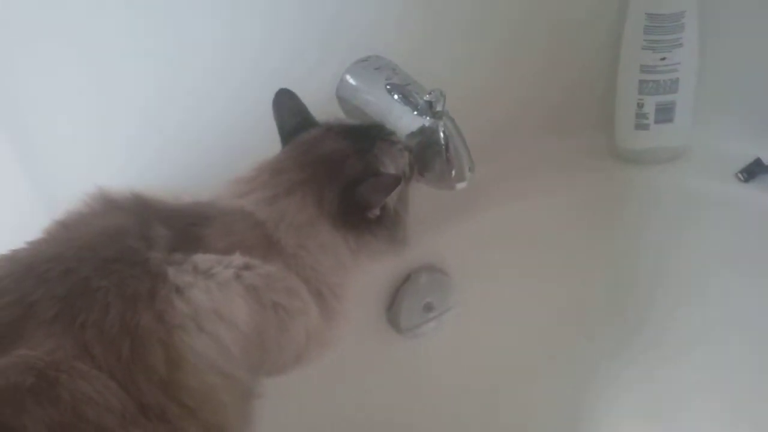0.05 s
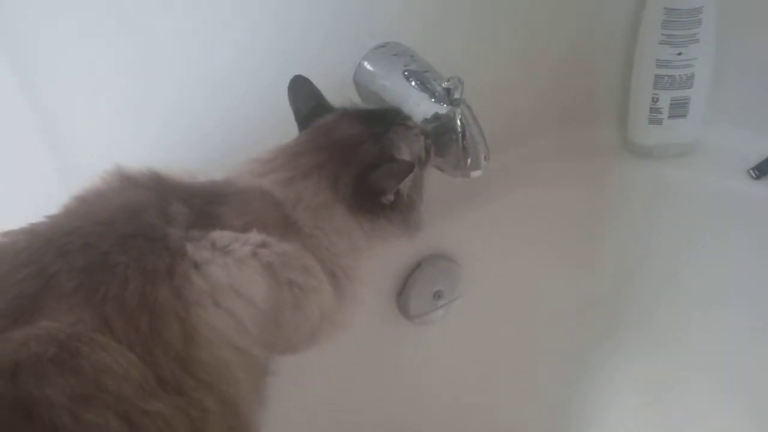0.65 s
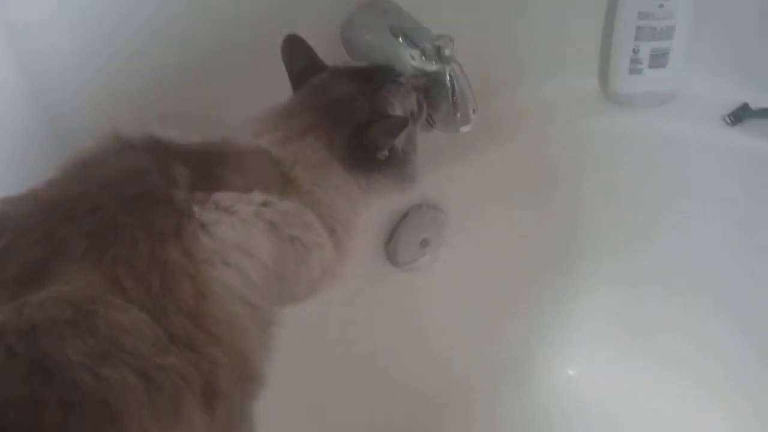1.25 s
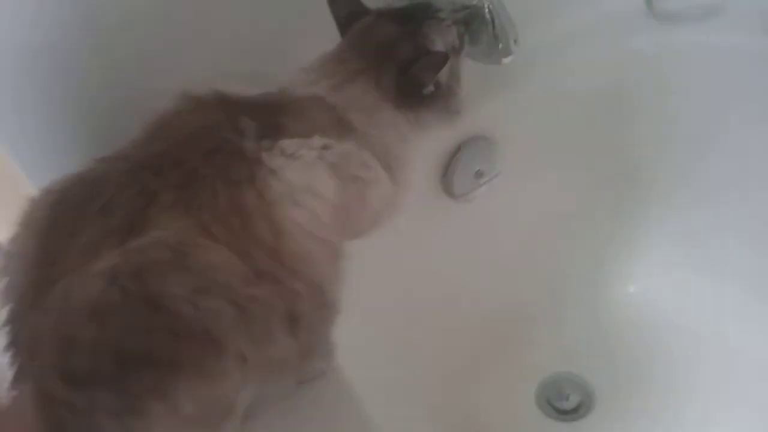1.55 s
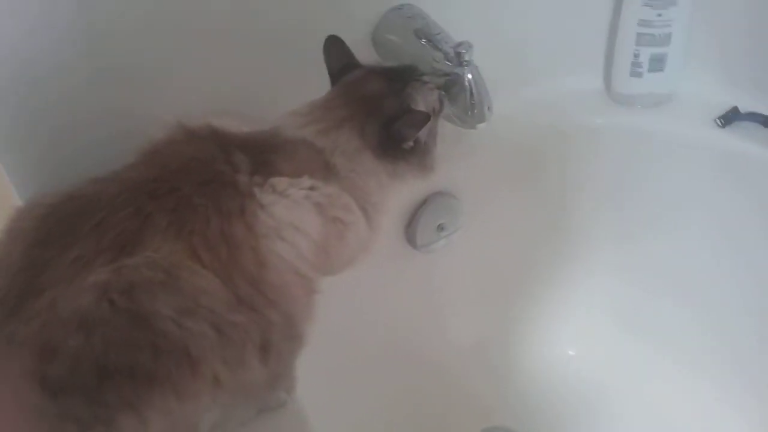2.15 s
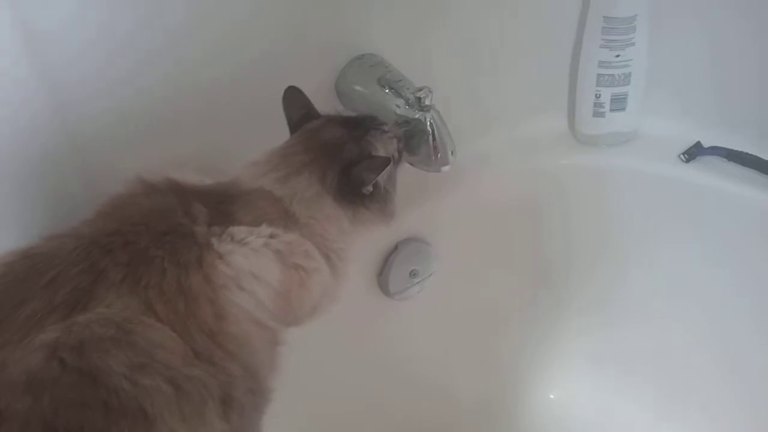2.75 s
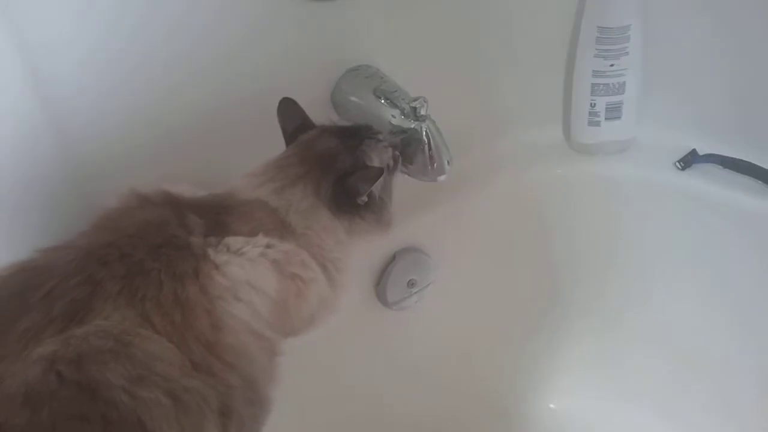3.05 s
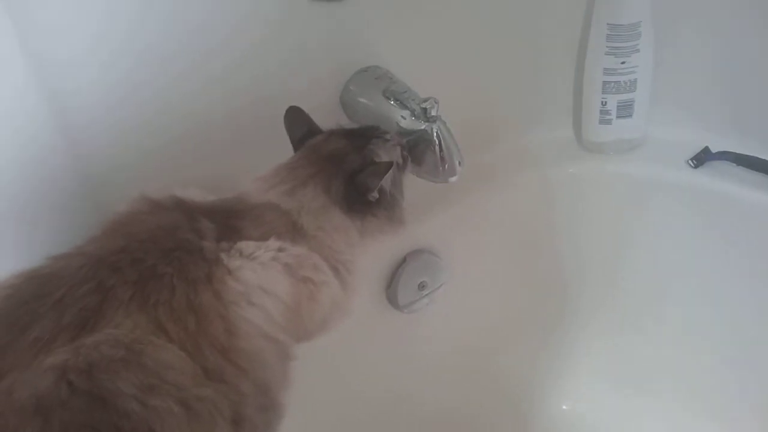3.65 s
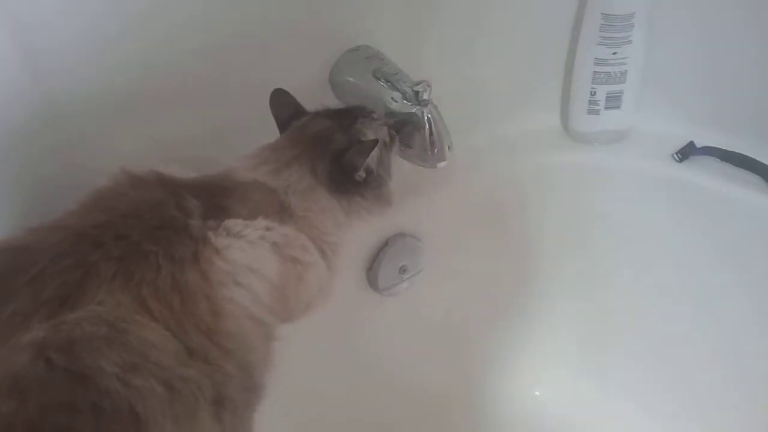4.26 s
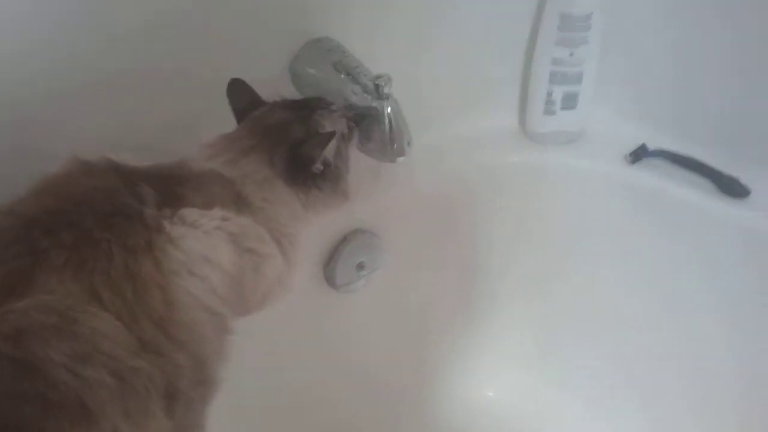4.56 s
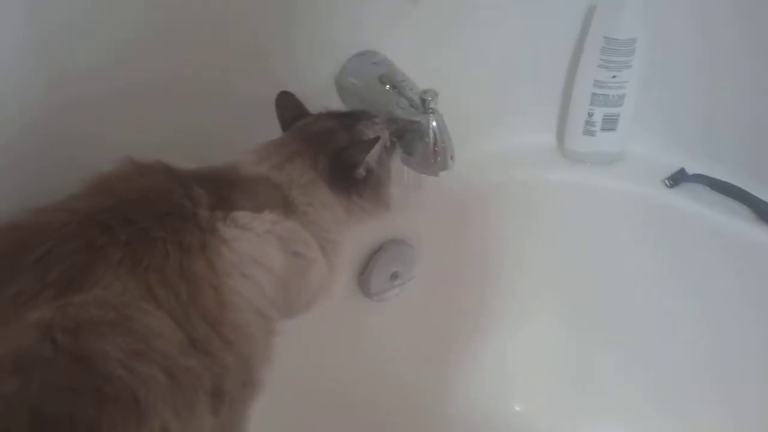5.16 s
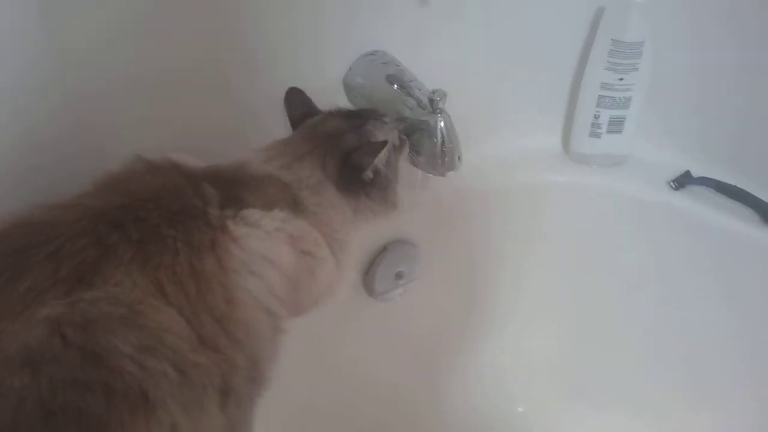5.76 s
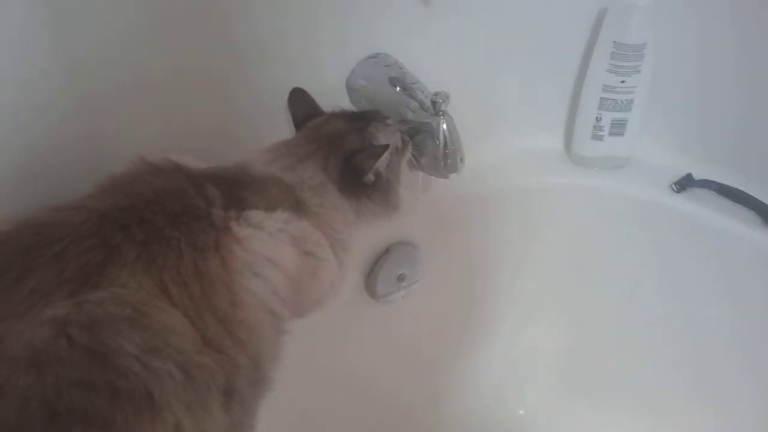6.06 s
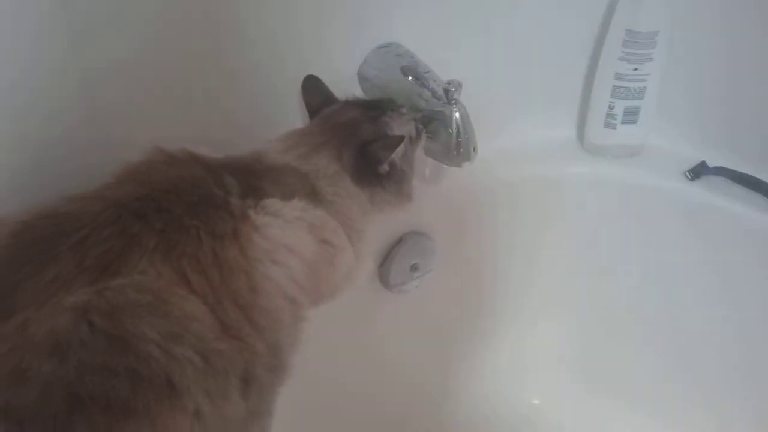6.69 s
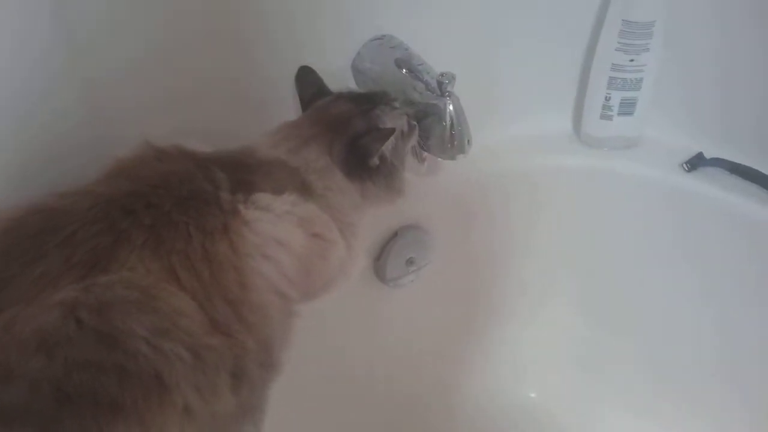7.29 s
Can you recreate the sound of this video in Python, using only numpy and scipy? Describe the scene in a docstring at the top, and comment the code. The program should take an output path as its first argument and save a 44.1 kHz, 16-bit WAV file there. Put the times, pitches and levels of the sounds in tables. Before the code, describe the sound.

A cat laps water from a bathtub tap, with soft wet smacks and irregular sharp, drip-like pops over faint room hiss.

```python
"""A tiled bathroom, heard from a hand-held microphone above the tub: a cat licks water from the spout.
Water films rupture between tongue and metal with a bright snap, and air pockets behind them ring as pops.
The tongue peels off wet surfaces in soft smacks, and tub and tiles reflect each of these sounds.
Behind them lie a few dull bumps, faint room hiss and a low wandering hum."""
import sys
import numpy as np
from scipy import signal
from scipy.fft import rfft, irfft
from scipy.io import wavfile

SR = 44100
rng = np.random.default_rng(int(sys.argv[2]) if len(sys.argv) > 2 else 0)


def persist_wave(psi):
    """Save psi, clipped to +-1, as 16-bit WAV."""
    counts = np.round(np.clip(psi, -1, 1) * 32767).astype(np.int16)
    wavfile.write(sys.argv[1], SR, np.atleast_2d(counts).T)


N = 327663

# spectra of a smack in the mouth, the hollow of the tub and the wet film: f/Hz, relative level/dB
MOUTH_SPECTRUM = [(300, -24), (900, -16), (1500, 4.5), (2100, 5.5), (3000, 2.5), (4200, -5), (6000, -27),
                  (12000, -50)]
TUB_SPECTRUM = [(150, -15), (370, -3.5), (520, -5.5), (650, -2), (730, 6), (830, -3), (1100, -4),
                (1800, -22), (5000, -29.5)]
WET_SPECTRUM = [(2000, -20.5), (4200, -9), (5500, 0), (6300, 3), (7200, -6), (9000, -20.5), (12000, -13),
                (15500, -18)]
FILM_HZ, FILM_SPREAD_HZ = 14700, 640   # the tiniest bubbles in a film ring near the top of hearing


def pops(lowpass_hz=7600, beam_db=2):
    """Bubble resonance: a film breaks with a snap and a knock, and the air pocket behind it rings."""
    # beads of water popping (levels are energies): t/s, ring level/dB, f/Hz, snap level/dB, room gain/dB
    beads = [(0.0647, -2, 6050, -24, 6.5), (0.9847, -4.5, 6000, -15.5, 5.7),
             (1.2644, -21.5, 6630, -27.5, 3.5), (2.6675, -3.5, 5400, -22.5, 5),
             (2.9896, -23.5, 5390, -28, 5), (3.6577, -28.5, 6800, -31, 8), (3.869, -23, 6450, -30.5, 5.5),
             (4.0176, -4.5, 6310, -25.5, 3), (4.8331, -15.5, 6370, -35, 10), (5.1544, -21.5, 6630, -31, 11),
             (6.0023, 4, 5820, -19, 2.5), (6.529, -20.5, 6600, -27, 10.5), (6.6055, -19.5, 5970, -19, 6),
             (6.857, -13, 5700, -39, 5.5)]
    # spectrum of the knock: f/Hz, relative level/dB
    knock_spectrum = [(500, -12), (1300, -5), (2200, 1), (3300, 8.5), (4400, 18.5), (5500, -1), (7500, -30),
                      (12000, -68)]
    out, knock = np.zeros(N), impulse(knock_spectrum)
    t = np.arange(len(knock)) / SR
    lowpass = signal.butter(2, lowpass_hz, fs=SR, output="sos")
    for onset, ring_db, hz, snap_db, room_db in beads:
        swell_cycles = 0.86 - 0.013 * ring_db   # time constant, longer when the film breaks gently
        age = t * hz / swell_cycles
        envelope = age ** 2.22 * np.exp(-age)
        ring = unit(signal.sosfilt(lowpass, envelope * np.sin(2 * np.pi * hz * t)))
        # the knock grows faster than the ring, and by 30 dB for each octave the pop is deeper
        knock_db = -19 + 1.9 * ring_db - 30 * np.log2(hz / 6260)
        resonance_db = 12 + 0.66 * (snap_db - ring_db)   # fades as the ring takes over
        add(out, onset, bathroom(from_db(ring_db) * ring, room_db))
        # the low knock spreads into the room, the high snap travels more directly
        add(out, onset, bathroom(from_db(knock_db) * knock, room_db + beam_db))
        add(out, onset, bathroom(from_db(snap_db) * snap(FILM_HZ, resonance_db), room_db - beam_db))
    return out


def snap(pitch_hz, resonance_db, width_hz=1300):
    """Impulse excitation: a breaking film clicks, with a spectral peak at its tiniest bubble's pitch."""
    # broadband spectrum of the rupture: f/Hz, relative level/dB
    rupture_spectrum = [(500, -40), (2000, -14), (4000, -14), (6200, -3), (8200, -2.5), (10000, -4),
                        (12000, -3.5), (14000, -4), (15500, -5.5), (17000, -26)]
    hz = np.geomspace(500, 20000, 120)
    broadband_db = np.interp(hz, *np.transpose(rupture_spectrum))
    peak_db = resonance_db / (1 + ((hz - pitch_hz) / width_hz) ** 2)
    return impulse(np.column_stack([hz, broadband_db + peak_db]))


def ticks(resonance_db=16, room_db=2.5):
    """Film rupture: small films give only a bright snap and a little wet crackle."""
    # thin films snapping: t/s, snap level/dB, f/Hz, crackle level/dB
    films = [(0.148, -28.5, 14200, -47), (0.187, -35.5, 11000, -43), (0.2286, -36.5, 14000, -49),
             (0.3135, -40, 12900, -36.5), (0.8707, -44, 13900, -44), (1.1297, -33, 12400, -44),
             (1.1426, -27.5, 14800, -46), (1.2234, -47, 12400, -28), (1.3675, -37, 15000, -35),
             (1.7073, -35.5, 15500, -31.5), (2.6985, -23.5, 15000, -45), (2.804, -34.5, 15700, -30.5),
             (3.4227, -39.5, 14500, -57), (4.149, -36, 13060, -42), (4.917, -38, 13800, -38),
             (5.289, -38, 15300, -36), (5.84, -39, 14700, -44.5), (6.078, -25.5, 15200, -39),
             (6.7454, -28, 10000, -28.5)]
    out = np.zeros(N)
    for onset, snap_db, hz, wet_db in films:
        add(out, onset, bathroom(from_db(snap_db) * snap(hz, resonance_db), room_db))
        add(out, onset, bathroom(from_db(wet_db) * peel(WET_SPECTRUM, decay_s=0.00094), room_db))
    return out


def smacks(room_db=6):
    """Source and filter: each smack is coloured by the mouth, the hollow of the tub and the wet film."""
    # smacks of tongue and mouth: t/s, mouth level/dB, tub level/dB
    strokes = [(0.001, -30.5, -28.5), (0.358, -39, -31), (0.866, -27, -32.5), (1.128, -22, -29.5),
               (1.542, -41.5, -39), (1.613, -42.5, -37), (2.029, -27.5, -32.5), (2.31, -37.5, -30),
               (2.985, -40, -32.5), (3.223, -37.5, -38), (3.296, -66, -33), (3.709, -28, -29),
               (3.953, -36.5, -35), (4.118, -28.5, -30), (5.38, -54, -35.5), (5.63, -58, -33.5),
               (5.95, -42, -33), (6.262, -39.5, -40), (7.076, -41, -30.5), (7.162, -40.5, -35)]
    out = np.zeros(N)
    for onset, mouth_db, tub_db in strokes:
        mouth = from_db(mouth_db) * peel(MOUTH_SPECTRUM)
        tub = from_db(tub_db) * peel(TUB_SPECTRUM, decay_s=0.0066)
        wet = from_db(-9 + 0.65 * mouth_db) * peel(WET_SPECTRUM)   # harder smacks are wetter
        add(out, onset, bathroom(mouth + tub + wet, room_db))
    return out


def peel(spectrum, decay_s=0.0044, clicks_per_s=4000):
    """Shot noise: the tongue leaves a wet surface in a run of tiny clicks that swells and dies."""
    t = seconds(.06)
    clicks = rng.standard_normal(len(t)) * (rng.random(len(t)) < clicks_per_s / SR)
    burst = clicks * np.sqrt(t) * np.exp(-t / decay_s)
    return unit(signal.fftconvolve(burst, impulse(spectrum)))


def faint_licks(count=36, spread_db=5.5, resonance_db=14, room_db=5):
    """Peeling and rupture at low level: the tongue keeps working about five times a second."""
    out = np.zeros(N)
    for k in range(count):
        onset = (k + rng.random()) * N / SR / count
        strength = from_db(spread_db * rng.standard_normal())
        mouth = from_db(-48) * peel(MOUTH_SPECTRUM, decay_s=0.0035)
        tub = from_db(-41) * peel(TUB_SPECTRUM, decay_s=0.0092)
        wet = from_db(-48) * peel(WET_SPECTRUM)
        film = from_db(-46) * snap(FILM_HZ + FILM_SPREAD_HZ * rng.standard_normal(), resonance_db)
        add(out, onset, strength * bathroom(mouth + tub + wet, room_db))
        add(out, onset, strength * bathroom(film, room_db))
    return out


def bathroom(sound, room_db, t60_s=0.25, early_db=-4, wall_s=.0098, roughness_db=1.5):
    """Reverberation: reflections lie room_db above the direct sound; the total energy is kept."""
    # first reflections off tub and tiles: delay/ms, level/dB relative to the diffuse tail
    reflections = [(1.1, -31.5), (10.3, -8.5), (12.0, -9.5), (16.4, -12.5), (23.0, -31)]
    t = seconds(.4)
    scatter = rng.standard_normal(len(t)) * from_db(roughness_db * rng.standard_normal(len(t)))
    decay = from_db(-60 * t / t60_s + early_db * (t < wall_s))   # weaker until the walls answer
    response = unit(scatter * decay * (t > .002))
    for delay_ms, db in reflections:
        path_shift = rng.uniform(.97, 1.03)   # head and hand move a little
        response[int(delay_ms * path_shift * SR / 1000)] += from_db(db)
    heard = from_db(room_db) * unit(signal.fftconvolve(sound, response))
    heard[:len(sound)] += unit(sound)   # the room outweighs this path when the cat's head is in the way
    return unit(heard) * np.sqrt(np.sum(sound ** 2))


def bumps(decay_s=0.061):
    """Damped impacts: decaying noise bursts give soft low knocks, as of a shifting paw or hand."""
    # dull bumps: t/s, level/dB
    impacts = [(1.157, -29.5), (4.12, -33), (4.45, -31), (4.822, -29.5), (5.09, -27.5), (5.31, -27.5),
               (5.394, -29), (6.018, -27), (7.079, -29.5)]
    # spectrum of a bump: f/Hz, relative level/dB
    bump_spectrum = [(40, -17.5), (80, -2), (110, 3.5), (170, 0), (240, -14.5), (400, -11.5), (1000, -57),
                     (4000, -63)]
    out, t = np.zeros(N), seconds(0.13)
    body = impulse(bump_spectrum, size=4096)
    for onset, db in impacts:
        push = rng.standard_normal(len(t)) * np.exp(-t / decay_s)
        add(out, onset, from_db(db) * unit(signal.fftconvolve(push, body)))
    return out


def air(hiss_rms_db=-68.5, waver_db=3.0, wavers_per_s=10):
    """Noise-driven resonances: narrow room modes and a broad peak near 6.3 kHz waver in a steady hiss."""
    # spectral density of the air noise: f/Hz, relative level/dB
    hiss_spectrum = [(24, -32.5), (40, -14), (104, -2), (297, -11), (363, -7), (467, -11), (503, -10),
                     (680, -12.5), (965, -15.5), (1440, -14), (1900, -14.5), (4930, -21.5), (6170, -24.5),
                     (9220, -30.5), (16000, -25)]
    # resonances wavering in the hiss, narrow ones of the room and a broad one near 6.3 kHz: f/Hz, bandwidth/Hz,
    # rms level/dB
    modes = [(97.7, 9.1, -80.5), (156.6, 19, -79), (363.7, 4.6, -81), (726, 30, -77), (755, 56, -83),
             (967, 29, -82), (6280, 410, -78.5)]
    hiss = signal.fftconvolve(rng.standard_normal(N + 8191), impulse(hiss_spectrum, size=8192), "valid")
    out = from_db(hiss_rms_db) * unit(hiss)
    for hz, width_hz, db in modes:
        b, a = signal.iirpeak(hz, hz / width_hz, fs=SR)
        resonance = signal.lfilter(b, a, rng.standard_normal(N))
        out += from_db(db) * unit(resonance * from_db(waver_db * drift(wavers_per_s)))
    return out * np.sqrt(N)   # unit energy becomes unit rms


def hum(fade_s=0.15, sag_db_per_s=3):
    """Linear frequency glides: low tones fade in, rise slowly in pitch as they weaken, and fade out."""
    # low hums: start t/s, end t/s, starting f/Hz, rise/(Hz/s), starting rms level/dB before the fade
    tones = [(-0.1, 0.52, 84.8, 16, -69.5), (0.45, 4.45, 49.5, 0.25, -71.5), (4.502, 8.7, 94, 3.25, -75.5),
             (5.6, 6.35, 62, 9, -72), (6.6, 9.9, 72.1, 2.5, -75.5)]
    out, t = np.zeros(N), np.arange(N) / SR
    for start, end, hz, rise, db in tones:
        age = t - start
        fade = np.clip(np.minimum(age, end - t) / fade_s, 0, 1)
        rms = from_db(db - sag_db_per_s * age) * fade
        phase = 2 * np.pi * np.cumsum(hz + rise * age) / SR
        out += np.sqrt(2) * rms * np.sin(phase)
    return out


def impulse(spectrum, size=1024):
    """Minimum phase: the sharpest causal click with this spectrum, at unit energy."""
    hz, db = np.transpose(spectrum)
    bin_hz = np.arange(size // 2 + 1) * SR / size
    magnitude = from_db(np.interp(np.log(bin_hz + 1), np.log(hz), db))
    cepstrum = irfft(np.log(magnitude))
    cepstrum[1:size // 2] *= 2   # fold the anticausal half onto the causal half
    cepstrum[size // 2 + 1:] = 0
    return unit(irfft(np.exp(rfft(cepstrum)), size))


def drift(knots_per_s):
    """Slow random modulation: straight lines between standard normal values."""
    knots = rng.standard_normal(400)
    return np.interp(np.arange(N) / SR * knots_per_s, np.arange(len(knots)), knots)


def from_db(db):
    """Amplitude ratio of a level in decibels."""
    return 10 ** (np.asarray(db) / 20)


def unit(x):
    """Normalisation to unit energy."""
    return x / np.sqrt(np.sum(x ** 2) + 1e-30)


def seconds(length_s):
    """Uniform sampling: a time axis in seconds."""
    return np.arange(int(length_s * SR)) / SR


def add(out, onset_s, sound):
    """Superposition: mix a sound in at its onset."""
    start = int(np.clip(round(onset_s * SR), 0, N - 1))
    out[start:start + len(sound)] += sound[:N - start]


def scene():
    """Superposition of the drinking cat and the quiet room, in mono."""
    return (pops() + ticks() + smacks() + faint_licks() + bumps() + air() + hum())[None, :]


def record(dry, low_hz=25, high_hz=16200):
    """Band limiting: the microphone drops the deepest bass and cuts the top steeply."""
    highpass = signal.butter(2, low_hz, "high", fs=SR, output="sos")
    lowpass = signal.ellip(10, .1, 70, high_hz, fs=SR, output="sos")
    return signal.sosfilt(lowpass, signal.sosfilt(highpass, dry))


dry = scene()
out = record(dry)
persist_wave(out)
```